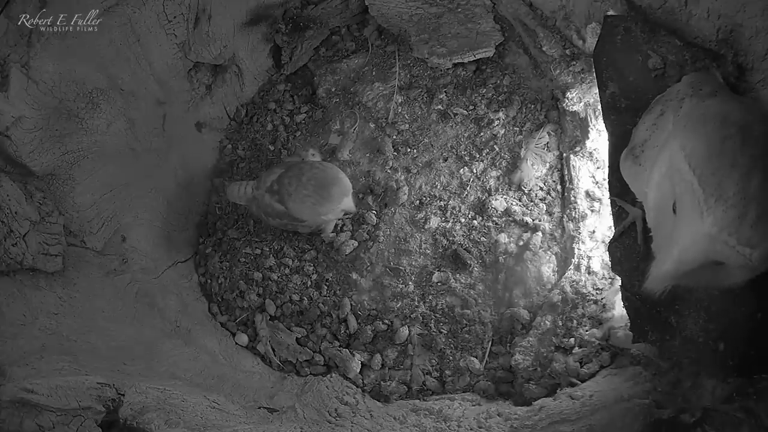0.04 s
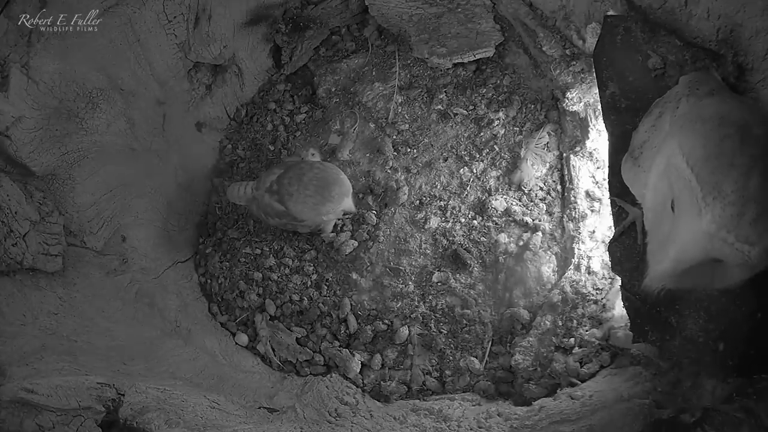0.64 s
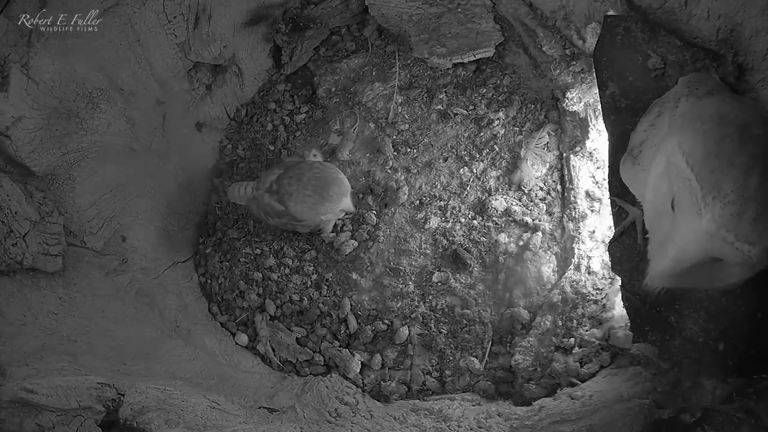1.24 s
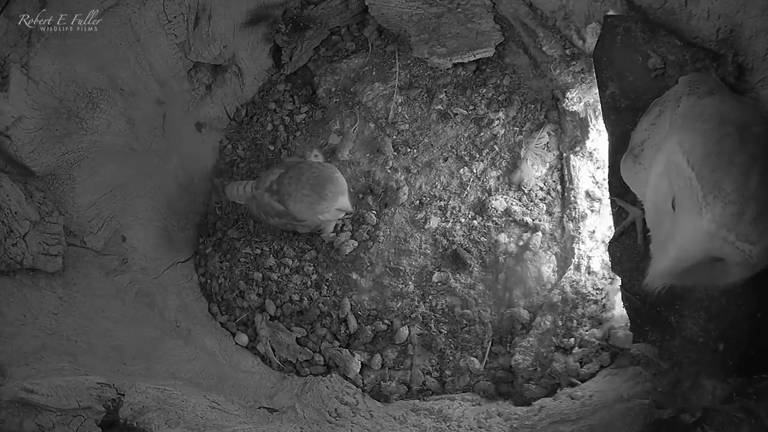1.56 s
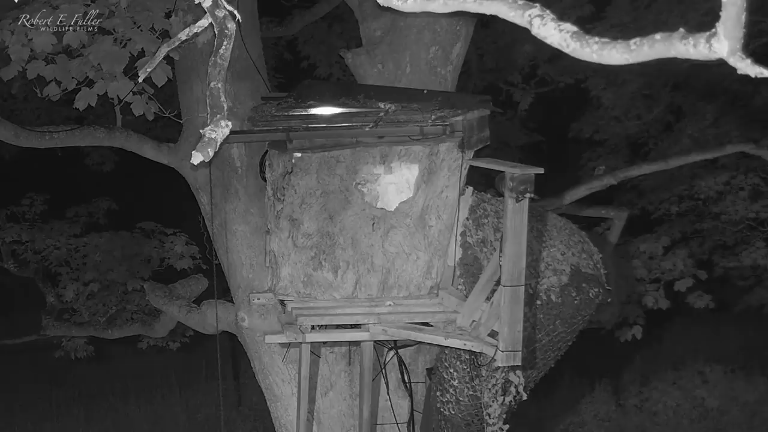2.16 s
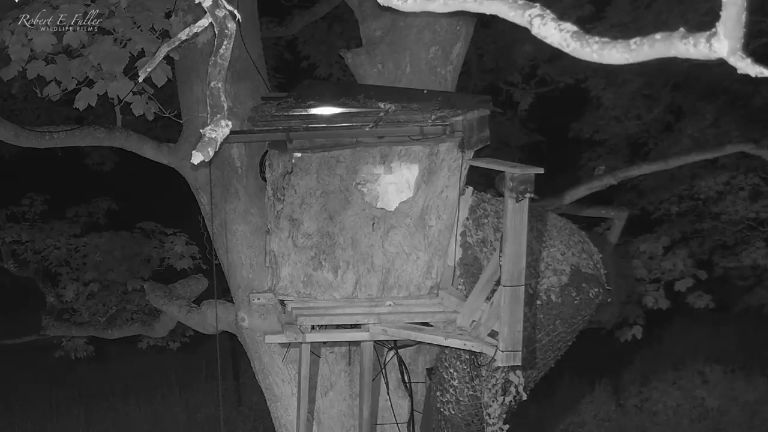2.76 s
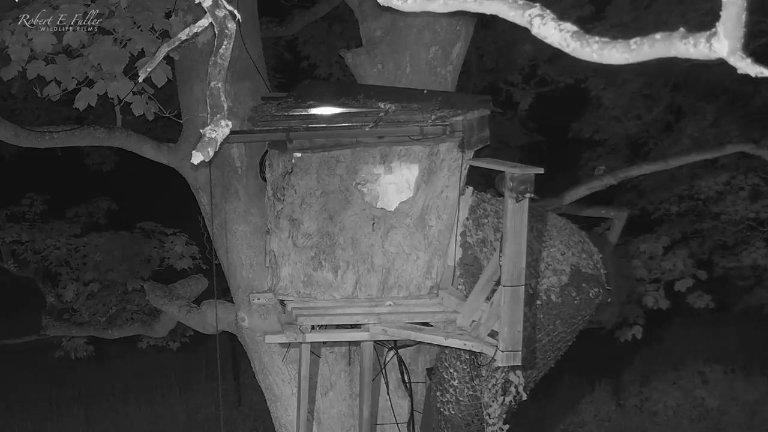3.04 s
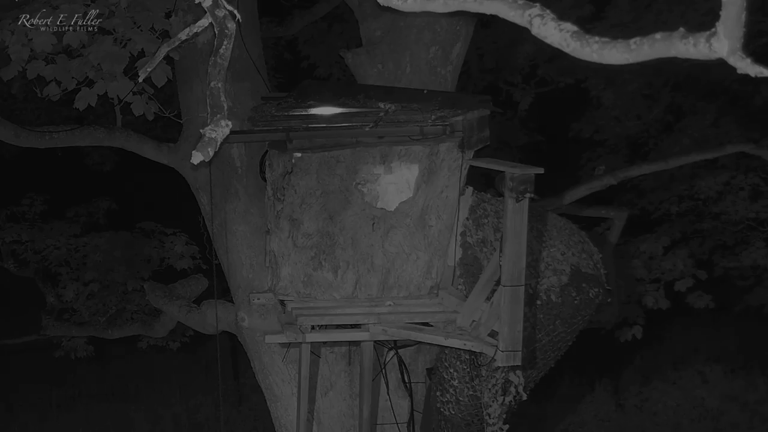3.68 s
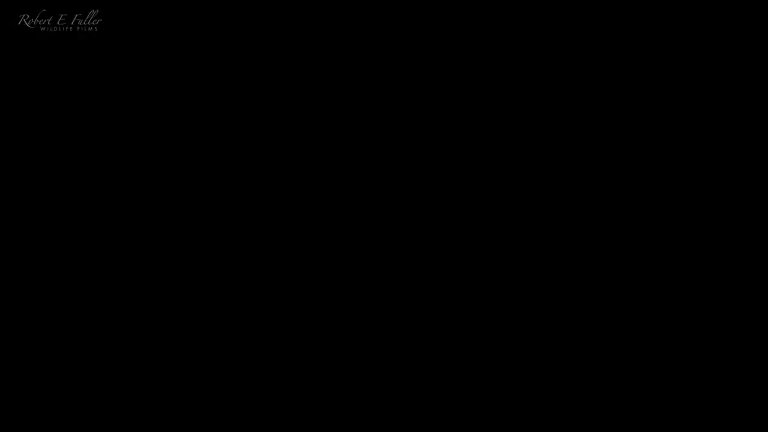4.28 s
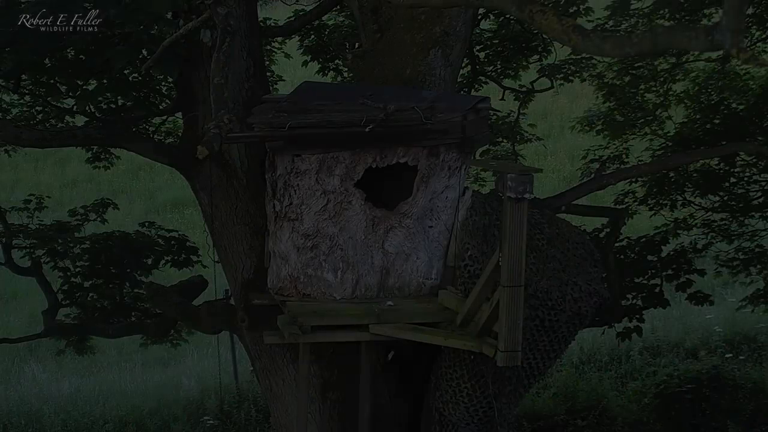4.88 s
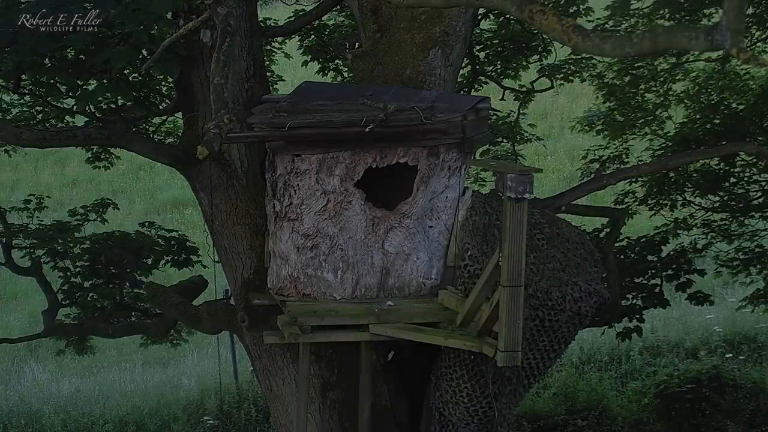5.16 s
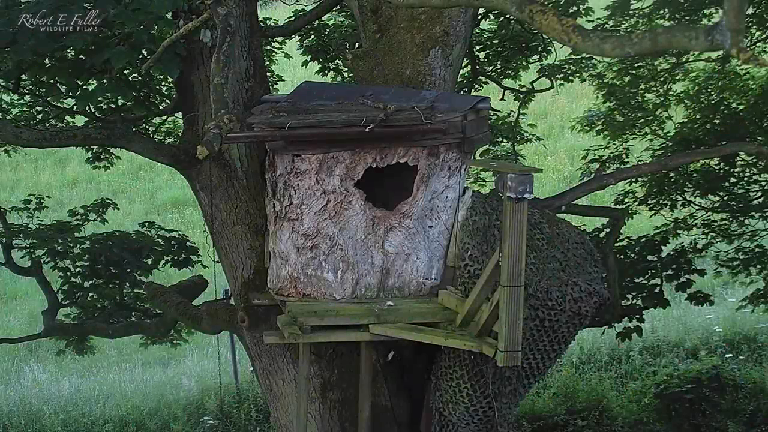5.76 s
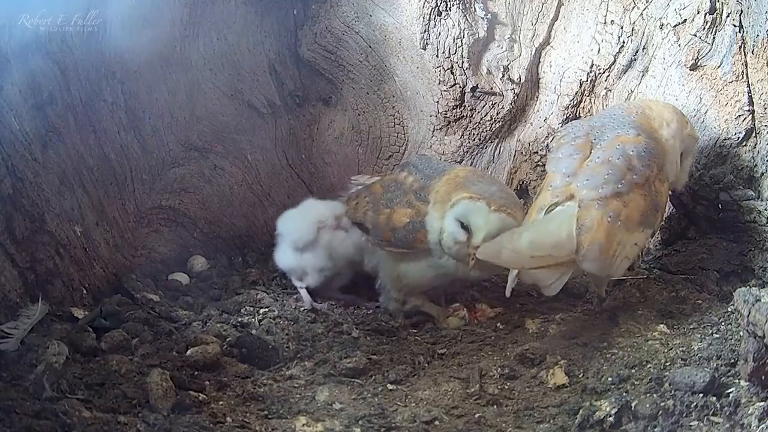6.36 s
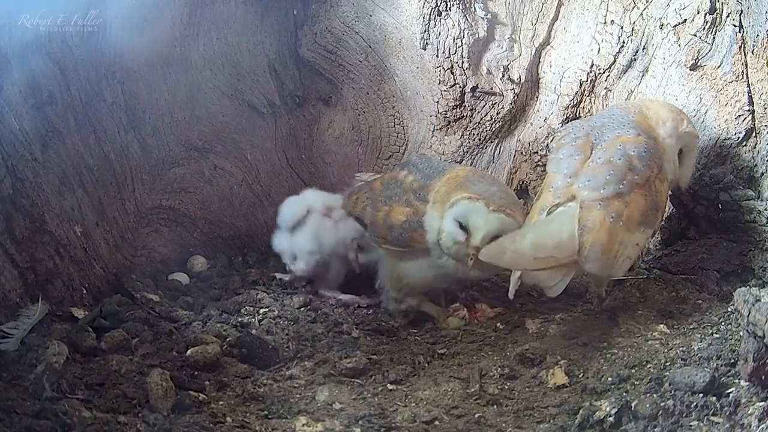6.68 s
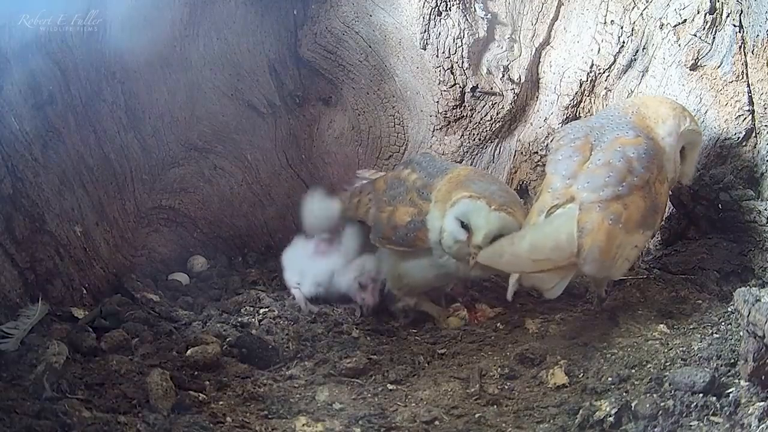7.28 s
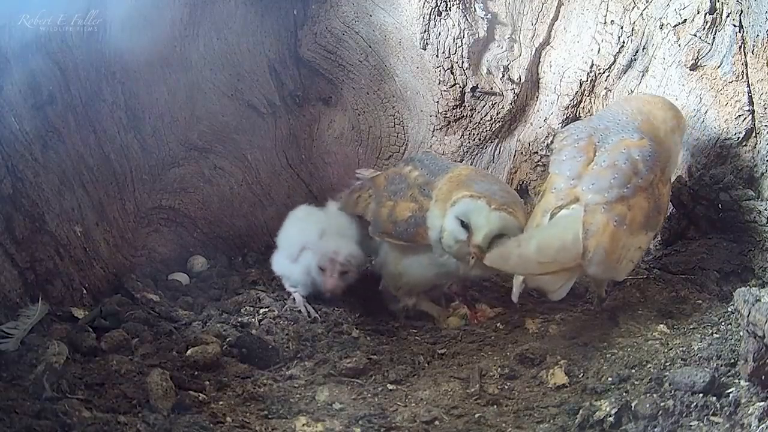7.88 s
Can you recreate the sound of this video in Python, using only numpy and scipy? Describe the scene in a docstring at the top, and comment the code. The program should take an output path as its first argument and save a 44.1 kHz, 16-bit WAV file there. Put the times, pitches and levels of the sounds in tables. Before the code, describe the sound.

A barn owl opens with a loud, harsh, rapidly trembling screech lasting about 0.7 seconds, close to a small, thin-sounding microphone that overloads slightly in the nest hollow. A second owl answers with a quieter fast trill. From 1.5 seconds a second screech swells, ending near 2.1 in a short falling squeal. Fainter hoarse trilling and soft rising whistles follow.

Between 3.2 and 4 seconds the nest fades into a much quieter tree by day, with steady low rumble, distant hum and a light breeze. Faint songbirds chirp and whistle in echoing glides until the end, including six lower falling calls from about 3.7 to 5.2. A few dry ticks and a tiny rustle come between 4.2 and 4.7, with stray ticks later. An owlet gives three soft, thin begging hisses at about 6.2, 7 and 7.7 seconds.

```python
"""A barn owl's rasping screech opens the scene, the first of two: chaotic vibration of the syrinx,
broken by pure bursts, overloads a small narrow-band microphone in the nest hollow. A second owl trills
between the screeches, then more faintly, ending in a rising whistle. The nest fades into a tree by day:
low rumble, the echoing glides of songbirds, a few ticks and an owlet's begging hisses, which are noise
shaped by one narrow resonance."""
import sys
import numpy as np
from scipy import signal
from scipy.fft import rfft, irfft, next_fast_len
from scipy.io import wavfile
from scipy.ndimage import uniform_filter1d, map_coordinates

SR = 44100
rng = np.random.default_rng(int(sys.argv[2]) if len(sys.argv) > 2 else 0)


def generate_wav(sig):
    """Save sig (samples, or channels by samples) to the path in sys.argv[1] as 16-bit PCM at SR."""
    pcm = np.round(np.clip(np.atleast_2d(sig).T, -1, 1) * 32767).astype(np.int16)
    wavfile.write(sys.argv[1], SR, pcm)


N = 353902
TIME = np.arange(N) / SR

# Tremor of each screech. Each row: time in seconds, beats per second.
FIRST_TREMOR = [(.002, 55.1), (.35, 55.1), (.42, 53.8), (.6, 53.1), (.74, 48.5)]
SECOND_TREMOR = [(1.39, 54.05), (1.575, 54.05), (1.763, 52.4), (1.955, 51.8), (2.045, 47)]
# Pure bursts of each screech. Each row: time in seconds, peak level in dB, width in beats.
FIRST_BURSTS = [(0, -19.5, 0.09), (.125, -7.5, 0.1), (.17, -18.5, 0.057), (.29, -8, .055), (.36, -6, .05),
                (0.451, -7, .05), (.475, -5.5, .12), (.54, -5, 0.11), (.59, -9.5, 0.082), (0.707, -9, 0.14),
                (.745, -27.5, 0.15)]
SECOND_BURSTS = [(1.39, -30, 0.051), (1.57, -17, .075), (1.86, -12, 0.083), (1.95, -18, .12),
                 (2.045, -18.5, .12)]
# Pace of each trill. Each row: time in seconds, syllables per second.
NEAR_TRILL_RATE = [(.777, 25), (.98, 25.6), (1.05, 27), (1.12, 24.3), (1.33, 23)]
FAR_TRILL_RATE = [(2.203, 25), (2.56, 24.9), (2.69, 23.2), (2.87, 23), (3.02, 21.2)]
# Trill syllables. Each row: time in seconds, pitch in Hz, level in dB, voiced half-width in beats.
NEAR_SYLLABLES = [(.58, 1808, -41, .55), (0.759, 1810, -36.5, .38), (1, 1834, -36, .28),
                  (1.05, 1804, -35, 0.6), (1.14, 1756, -38.5, 0.43), (1.24, 1784, -36.5, .45),
                  (1.33, 1800, -46, .46)]
FAR_SYLLABLES = [(2.19, 1771, -54.5, .3), (2.5, 1790, -46, 0.33), (2.749, 1800, -44.5, 0.24),
                 (2.87, 1760, -51, 0.18), (3.01, 1900, -44, 0.37)]
# Pure endings of the calls. Each row: levels of harmonics 1 to 3 in dB, then a glide whose points
# give time in seconds, pitch in Hz, level in dB.
WHISTLES = [ ((-23.5, 0, -28), [(2.04, 1190, -30), (2.058, 1154, -15), (2.083, 1130, -23.5),
            (2.098, 1063, -33.5), (2.118, 684, -51)]), ((0, -7, -27), [(2.62, 1021, -64),
            (2.7, 1022, -53.5), (2.87, 1062, -57), (2.99, 1113, -48), (3.04, 1140, -56)]), ((-6, 0, -8),
            [(3.03, 1152, -59), (3.11, 1160, -50), (3.15, 1155, -62), (3.19, 1090, -66)]), ((0, -10, -34),
            [(3.28, 1840, -63), (3.325, 1460, -41), (3.35, 1420, -61)])]

# Envelopes of noisy sounds. Each row: start of the hold and its length in seconds, level in dB,
# swell over the hold in dB, attack and release in seconds per 30 dB.
SCREECH_RASPS = [(0, 0.701, -19, 0.5, .05, 0.14), (.76, .25, -39, 2, .05, .13),
                 (1.1, .28, -44.5, 0, .05, .1), (1.53, 0.504, -26, 1.5, 0.35, 0.083)]
TRILL_RASPS = [(.72, 0.016, -34, -2, .03, 0.28), (.8, 0.23, -41.5, 2.5, .05, .3),
               (1.15, 0.37, -47.5, -2.5, .1, .05)]
HOARSE_TONE = [(2.3, .25, -55, 2, .25, .5)]
RUSTLE = [(4.25, 0.3, -69, 3.5, 0.2, 0.42)]
# The owlet's hisses. Each row: an envelope as above, then a frequency ratio for the resonance.
HISSES = [(6.242, .29, -54, 2, .12, .45, 1), (6.97, 0.33, -52, -0.5, 0.09, 0.55, 1.018),
          (7.72, .3, -49.5, -1, 0.055, .4, .985)]
# Upward slides that open two hisses. Each entry: start in seconds.
HISS_SLIDES = [6.905, 7.685]

# Spectra of voices and background noise. Each row: frequency in Hz, relative spectral density in dB.
SCREECH_THROAT = [(760, -43.5), (1400, -34.5), (1750, -33), (1920, -25.5), (2060, -7.5), (2320, 0),
                  (2480, -2), (2700, -14), (3070, -26), (3360, -31.5), (3900, -24.5), (4300, -42)]
TRILL_THROAT = [(1200, -39.5), (1650, -6.5), (1850, 12), (2100, 1), (2600, 2), (3000, 5), (3350, -3.5),
                (3650, 4), (4000, -21.5), (4500, -52.5)]
HOARSE_BAND = [(1950, -33.5), (2110, -8), (2180, -0.5), (2300, -9), (2480, -12.5), (2600, -34.5)]
OWLET_THROAT = [(1800, -40), (2350, 0), (2650, 23), (2900, 21), (3200, -27), (4200, -97), (6000, -62.5)]
CHORUS_BAND = [(2200, 0), (3200, 9.5), (4500, 5.5), (6500, -3.5), (7500, -30), (10000, -49.5)]
NEST_AIR_BAND = [(24, -34.5), (40, -19.5), (170, -26.5), (250, -12), (350, -15.5), (445, -6), (605, 1),
                 (850, -10.5), (1040, -1.5), (1300, -8.5), (1780, -1), (2240, -6), (2620, -16),
                 (3630, -12.5), (4000, -25)]
RUMBLE_BAND = [(12, -47), (22, -29), (32, -12), (41, 3), (50, -1), (60, -15.5), (72, -0.5), (90, -22),
               (110, -14.5), (140, -20.5), (250, -35), (600, -77)]
BREEZE_BAND = [(80, -21.5), (170, 7.5), (280, 4), (420, -0.5), (620, 0), (850, -3.5), (1350, -6),
               (1700, -12.5), (2200, -18.5), (3200, -16.5), (5000, -28.5), (8000, -29), (10000, -32),
               (16000, -32)]

# Single songbird whistles. Each row: start and length in seconds, first, middle and last pitch in Hz,
# relative level in dB.
SONG_NOTES = [(3.39, .2, 4534, 4510, 4420, -55.5), (3.53, 0.51, 3210, 3240, 3190, -61.5),
              (3.601, 0.081, 3780, 3860, 3870, -54.5), (3.613, 0.031, 2850, 2420, 1950, -52),
              (4.008, .07, 7200, 7230, 7200, -59), (4.533, 0.076, 4300, 4130, 3780, -57),
              (4.574, 0.088, 2860, 2640, 2710, -51.5), (4.49, 0.0336, 3140, 2850, 2600, -58),
              (4.739, .063, 6200, 5600, 5780, -55), (4.78, 0.049, 4300, 4590, 5250, -47),
              (4.81, 0.092, 5430, 5750, 5070, -55), (5.05, 0.034, 3295, 3144, 3560, -40),
              (5.16, 0.044, 2920, 3600, 4330, -52), (5.218, 0.065, 4400, 4750, 4660, -48.5),
              (5.224, .08, 6000, 6430, 6900, -57), (5.344, 0.057, 5440, 5260, 5220, -53),
              (5.35, 0.094, 8140, 7600, 7500, -65), (6.088, 0.092, 6940, 6700, 7100, -58),
              (6.27, 0.033, 3200, 3480, 3480, -50.5), (6.35, 0.23, 8050, 8300, 8450, -68),
              (6.374, 0.058, 6600, 7050, 7400, -56.5), (6.471, 0.09, 5320, 4860, 4940, -59),
              (6.537, 0.095, 5250, 5680, 5800, -54), (6.545, 0.22, 5920, 6400, 6760, -59),
              (6.889, .097, 6950, 6830, 6500, -59), (7.055, 0.046, 5300, 4950, 5100, -52),
              (7.14, .08, 8000, 7950, 7900, -66), (7.434, .035, 5200, 5200, 5200, -54),
              (7.918, .045, 5700, 4640, 4000, -56)]
# Phrases of one repeated note. Each row: start in seconds, note count, period and note length in seconds,
# first, middle and last pitch in Hz, relative level in dB, growth in dB per note.
SONG_PHRASES = [(3.681, 6, .1255, 0.055, 5100, 5150, 3600, -63, 0.5),
                (3.718, 6, .1245, 0.0362, 4110, 3690, 3540, -58.5, 1.54),
                (3.848, 2, .131, .016, 8600, 7770, 7250, -58.5, 0),
                (4.993, 2, .158, .059, 6600, 5920, 4700, -60, -12),
                (5.016, 2, .077, .04, 2530, 3210, 3190, -43, -2),
                (5.05, 3, 0.047, .012, 3140, 3510, 3970, -51, 0.5),
                (5.448, 3, 0.028, .029, 4100, 3946, 3860, -50.5, 0.2),
                (5.574, 3, .151, .055, 6200, 5180, 4500, -61.5, 2),
                (6.085, 3, .083, .026, 4210, 5270, 5860, -53, 0),
                (7.142, 3, .187, 0.014, 6350, 6520, 6900, -53, -4.5),
                (7.186, 4, .188, 0.083, 7280, 5640, 4120, -52.5, -.4),
                (7.625, 2, .05, .019, 3890, 3625, 3340, -48.5, -4)]
# Bouts of chirps. Each row: start and length in seconds, chirp count, pitch in Hz, relative level in dB.
TWITTER = [(3.396, .2, 5, 4620, -59), (3.997, 0.28, 3, 8240, -68), (6.047, .55, 12, 4450, -62.5),
           (7.563, 0.37, 9, 3510, -59)]
# Dry ticks. Each row: start in seconds, relative level in dB.
TICKS = [(4.248, -46.5), (4.3223, -45.5), (4.4846, -52.5), (4.5769, -45), (4.7158, -47), (5.435, -46),
         (6.5032, -47.5), (7.0057, -46), (7.2145, -50)]
# Partials of a far hum. Each row: frequency in Hz, level in dB.
HUM_PARTIALS = [(58.5, -43.5), (97, -42.5)]
# Loudness of the background layers. Each row: time in seconds, level in dB.
NEST_AIR_LEVEL = [(0, -53.5), (.6, -49.5), (.9, -55), (1.3, -47), (1.8, -52), (2.3, -53), (3.5, -55)]
CHORUS_LEVEL = [(3.3, -70.5), (3.5, -57), (4.3, -61.5), (4.65, -67), (4.9, -53.5), (5.9, -58), (6.5, -62.5),
                (7.4, -68.5), (8.02, -57)]
BUZZ_LEVEL = [(0, -61), (2, -67), (4, -74.5), (5.7, -81.5), (6.3, -88), (6.6, -82), (8.02, -63.5)]


def near_owl():
    """Source and filter: the throat resonance shapes a chaotic rasp, which yields to each pure burst."""
    first, lock_a = pure_bursts(FIRST_TREMOR, FIRST_BURSTS, pitch_hz=2360, scatter_db=.9, scatter_hz=15)
    second, lock_b = pure_bursts(SECOND_TREMOR, SECOND_BURSTS,
                                 pitch_hz=2277, scatter_db=1.2, scatter_hz=28)
    chaos = signal.hilbert(noise(SCREECH_THROAT, patchy_db=3))
    rasp = unit(np.real(chaos / np.sqrt(1 + abs(chaos / 3) ** 2)))  # the syrinx's swing is bounded
    unlocked = 1 - .95 * np.sqrt(abs(lock_a + lock_b))
    # halfway between bursts the voice flicks up to a thin high edge
    between = sum(during(span) * np.sin(np.pi * beat(rates)[1]) ** 6
                  for rates, span in [(FIRST_TREMOR, FIRST_BURSTS), (SECOND_TREMOR, SECOND_BURSTS)])
    edge = amp(-29) * between * noise([(3300, -40.5), (3800, -1), (4000, 5), (4400, -45.5)])
    return first + second + swells(SCREECH_RASPS) * (unlocked * rasp + edge)


def pure_bursts(rates, bursts, pitch_hz, scatter_db, scatter_hz, delay_beats=0):
    """Once a beat the syrinx locks into periodic vibration. Returns the tone and the degree of lock."""
    index, offset = beat(rates)
    db, width = curves(bursts)
    size, detune, stretch = rng.standard_normal((index.max() + 1, 3))[index].T
    width = width * np.exp(.068 * stretch)
    lock = np.exp(-.5 * ((offset - delay_beats) / width) ** 2) * during(bursts)
    tone = np.sin(phase_of(pitch_hz + scatter_hz * detune + 25 * wobble(400)))
    return amp(db + scatter_db * size) * lock * tone, lock


def second_owl():
    """Periodic and noisy voicing: bursts and rasp part the near syllables; the far trill is hoarse."""
    near, voiced = trill(NEAR_TRILL_RATE, NEAR_SYLLABLES, rise_hz=60, octave_db=-2)
    far, _ = trill(FAR_TRILL_RATE, FAR_SYLLABLES, rise_hz=180, octave_db=-11)
    # a sharp, louder burst follows each near syllable
    burst_rows = [(s, db + 5.5, .1) for s, _, db, _ in NEAR_SYLLABLES]
    bursts, _ = pure_bursts(NEAR_TRILL_RATE, burst_rows,
                            pitch_hz=2224, scatter_db=2, scatter_hz=49.5, delay_beats=.31)
    rasp = swells(TRILL_RASPS) * noise(TRILL_THROAT)
    hoarse = swells(HOARSE_TONE) * noise(HOARSE_BAND)
    return near + far + bursts + rasp * (1 - voiced) + hoarse


def trill(rates, syllables, rise_hz, octave_db):
    """Amplitude modulation cuts a tone and its octave into rising syllables. Returns sound, voicing."""
    index, offset = beat(rates)
    size, detune = rng.standard_normal((index.max() + 1, 2))[index].T
    pitch, db, half_width = curves(syllables)
    position = offset / half_width
    voiced = np.cos(np.pi / 2 * np.clip(position, -1, 1)) ** 4 * during(syllables)
    phase = phase_of(pitch + rise_hz * position + 12 * detune + 18 * wobble(250))
    tone = np.sin(phase) + amp(octave_db) * np.sin(2 * phase)
    return amp(db + 1.1 * size) * voiced * tone, voiced


def whistles():
    """Harmonic series: at the end of a call the voice clears into three partials that glide together."""
    out = np.zeros(N)
    for harmonics, glide in WHISTLES:
        pitch, level = curves(glide)
        phase = phase_of(pitch * (1 + .004 * wobble(110)))
        tone = sum(amp(db) * np.sin(k * phase) for k, db in enumerate(harmonics, 1))
        out += during(glide) * amp(level) * tone
    return out


def nest_microphone(x, ceiling, sample_hz=8000):
    """Saturation and aliasing: peaks flatten, and their third harmonic folds to a thud near 900 Hz."""
    narrow = signal.resample_poly(x, sample_hz, SR, window=("kaiser", 7))
    flattened = narrow / (1 + abs(narrow / ceiling) ** 10) ** (1 / 10)
    return signal.resample(flattened, round(len(narrow) * SR / sample_hz))[:N]


def nest():
    """Superposition: owls, the air of the hollow and mains hum add at the microphone, then fade away."""
    air = amp(curves(NEST_AIR_LEVEL)[0]) * noise(NEST_AIR_BAND)
    mains = sum(np.sin(2 * np.pi * (50 * k * TIME + rng.random())) / np.sqrt(k) for k in range(1, 7))
    owls = near_owl() + second_owl() + whistles()
    fade = np.interp(TIME, [3.15, 3.5], [1, 0])
    return fade * nest_microphone(owls + air + amp(-73.5) * mains, ceiling=.39)


def owlet():
    """One narrow resonance filters noise into begging hisses and slides up as the beak opens."""
    out = np.zeros(N)
    for *envelope, ratio in HISSES:
        out += swells([envelope]) * noise([(hz * ratio, db) for hz, db in OWLET_THROAT])
    for s in HISS_SLIDES:
        add(out, s, amp(-49.5) * note(.055, 2220, 2600, 2940, waver=.03))
    return out


def songbirds():
    """Whistled glides echo in the trees; random frequency modulation makes fast upsweeps scratchy."""
    song = np.zeros(N)
    for s, length, start_hz, middle_hz, end_hz, db in song_notes():
        scratch = np.clip((end_hz - start_hz) / (length * 60000), 0, 1)  # full at 60000 Hz a second
        waver = .0112 + .085 * scratch ** 2
        add(song, s, amp(db) * note(length, start_hz, middle_hz, end_hz, waver))
    return amp(2.5) * woods(song, t60=.91, wet_db=-2)


def song_notes(repeat_spread=.012, chirp_spread=.083, chirp_s=.03):
    """Repetition with random pitch scatter adds phrases and chirps to the list of single whistles."""
    notes = list(SONG_NOTES)
    for s, count, period, length, *pitches, db, growth_db in SONG_PHRASES:
        for k, bends in enumerate(rng.standard_normal((round(count), 3))):
            bent = pitches * np.exp(repeat_spread * bends)
            notes.append((s + k * period, length, *bent, db + k * growth_db))
    for s, length, count, hz, db in TWITTER:
        for k, (*bends, size) in enumerate(rng.standard_normal((round(count), 4))):
            pitches = hz * np.exp(chirp_spread * np.array(bends))
            notes.append((s + length * (k + rng.random()) / count, chirp_s, *pitches, db + 2 * size))
    return notes


def note(length, start_hz, middle_hz, end_hz, waver, flutter_db=3):
    """A pure tone glides along a parabola, randomly modulated in frequency and amplitude."""
    progress = np.linspace(0, 1, max(round(length * SR), 64))
    pitch = np.polyval(np.polyfit([0, .5, 1], [start_hz, middle_hz, end_hz], 2), progress)
    drift, flutter = (map_coordinates(knots, [progress * length * 250], mode="mirror")
                      for knots in rng.standard_normal((2, 128)))
    envelope = np.sqrt(abs(np.sin(np.pi * progress))) * unit(amp(flutter_db * flutter))
    return envelope * np.sin(phase_of(pitch * (1 + waver * drift)))


def far_birds(start_s=3.662, period_s=.296):
    """Six falling calls reverberate; behind them a chorus blurs into patchy band-limited noise."""
    calls = np.zeros(N)
    for k in range(6):
        db = -49 - .9 * (k - 2.5) ** 2  # loudest in the middle of the run
        add(calls, start_s + k * period_s, amp(db) * note(.115, 1520, 1370, 1170, waver=.007))
    chorus = amp(curves(CHORUS_LEVEL)[0]) * during(CHORUS_LEVEL) * noise(CHORUS_BAND, patchy_db=7)
    return woods(calls, t60=.59, wet_db=-5.5) + chorus


def woods(x, t60, wet_db):
    """Reverberation: trunks and leaves scatter an echo that falls 60 dB in t60 seconds."""
    t = TIME[:SR]
    tail = rng.standard_normal(SR) * amp(-60 * t / t60) * (1 - np.exp(-t / .0016))
    return x + amp(wet_db) * signal.fftconvolve(x, tail / np.linalg.norm(tail))[:N]


def ticks_and_rustle(t60=.0098):
    """Broadband transients: noise decays exponentially in each tick and flickers in a brief rustle."""
    ticks, t = np.zeros(N), TIME[:1024]
    for s, db in TICKS:
        add(ticks, s, amp(db - 1.5 - 60 * t / t60) * rng.standard_normal(len(t)))
    grains = unit(amp(7 * wobble(280)) * rng.standard_normal(N))
    return ticks + swells(RUSTLE) * grains


def outdoors(start_s=3.185, fade_s=.82):
    """The continuous spectra of rumble and breeze fade in with two wavering partials of a far hum."""
    rumble = amp(-33.5) * noise(RUMBLE_BAND)
    hum = sum(amp(db + 2.9 * wobble(6.2)) * np.sin(phase_of(hz + 1.48 * wobble(5.5)))
              for hz, db in HUM_PARTIALS)
    breeze = amp(-46.5) * noise(BREEZE_BAND, patchy_db=.5)
    fade = np.clip((TIME - start_s) / fade_s, 0, 1) ** .77
    return fade * (rumble + hum + breeze)


def electrical_buzz():
    """Faint harmonics of 125 Hz and hiss, in antiphase between the two channels."""
    harmonics = sum(rng.uniform(.4, 1) * np.sin(2 * np.pi * (125 * k * TIME + rng.random()))
                    for k in range(2, 10))
    hiss = noise([(60, -6), (200, -8.5), (500, 0), (1000, .5), (1500, -11.5), (1800, -42.5)])
    side = amp(curves(BUZZ_LEVEL)[0]) * unit(.7 * unit(harmonics) + hiss)
    return np.array([side, -side])


def noise(spectrum, patchy_db=0):
    """Spectral shaping: white noise takes on drifting patches and a (Hz, dB) colour, at rms 1."""
    source = rng.standard_normal(N)
    if patchy_db:
        frames = signal.stft(source, SR, nperseg=512)[2]
        patches = uniform_filter1d(rng.standard_normal(frames.shape), size=4, axis=0)
        patches = unit(uniform_filter1d(patches, size=14, axis=1))
        source = signal.istft(frames * amp(patchy_db * patches), nperseg=512)[1][:N]
    size = next_fast_len(N + 8192)
    hz, db = np.transpose(spectrum)
    gain = amp(np.interp(np.log(np.fft.rfftfreq(size, 1 / SR) + 1), np.log(hz), db))
    return unit(irfft(rfft(source, size) * gain, size)[:N])


def swells(rows):
    """Exponential envelopes that attack, hold with a slight swell and release; the loudest prevails."""
    gains = []
    for s, hold, db, swell_db, attack, release in rows:
        t = TIME - s
        outside = np.maximum(-t, 0) / attack + np.maximum(t - hold, 0) / release
        gains.append(amp(db + swell_db * np.clip(t / hold, 0, 1) - 30 * outside))
    return np.max(gains, axis=0)


def beat(rates):
    """Rate integrates to a count, with a beat on the first row. Returns nearest beat, offset from it."""
    count = np.cumsum(curves(rates)[0]) / SR
    count -= np.interp(rates[0][0], TIME, count)
    nearest = np.round(count)
    return (nearest - nearest.min()).astype(int), count - nearest


def phase_of(hz):
    """Phase in radians is the integral of angular frequency."""
    return 2 * np.pi * np.cumsum(hz) / SR


def wobble(rate):
    """Spline interpolation through random knots, rate of them a second."""
    return map_coordinates(rng.standard_normal(int(N * rate / SR) + 4), [TIME * rate])


def curves(rows):
    """Linear interpolation gives one value per sample for each column after the time."""
    times, *columns = np.transpose(rows)
    return [np.interp(TIME, times, column) for column in columns]


def during(rows):
    """A smoothed gate over the span of a table."""
    return uniform_filter1d(1. * ((TIME >= rows[0][0]) & (TIME <= rows[-1][0])), size=200)


def add(track, s, sound):
    """Superpose a sound on the track at s seconds."""
    part = track[round(s * SR):][:len(sound)]
    part += sound[:len(part)]


def amp(db):
    """Decibels to amplitude ratio."""
    return 10 ** (np.asarray(db) / 20)


def unit(x):
    """Normalise to rms 1."""
    return x / np.sqrt(np.mean(x ** 2) + 1e-20)


def scene():
    """Superposition of all sources: the night nest, then the tree by day."""
    birds = nest() + songbirds() + far_birds() + owlet()
    return birds + ticks_and_rustle() + outdoors() + electrical_buzz()


def record(dry):
    """An ideal low-pass filter removes everything above the band limit."""
    size, limit_hz = next_fast_len(N + 8192), 15750
    passband = np.fft.rfftfreq(size, 1 / SR) < limit_hz
    return irfft(rfft(dry, size) * passband, size)[:, :N]


dry = scene()
out = record(dry)
generate_wav(out)
```